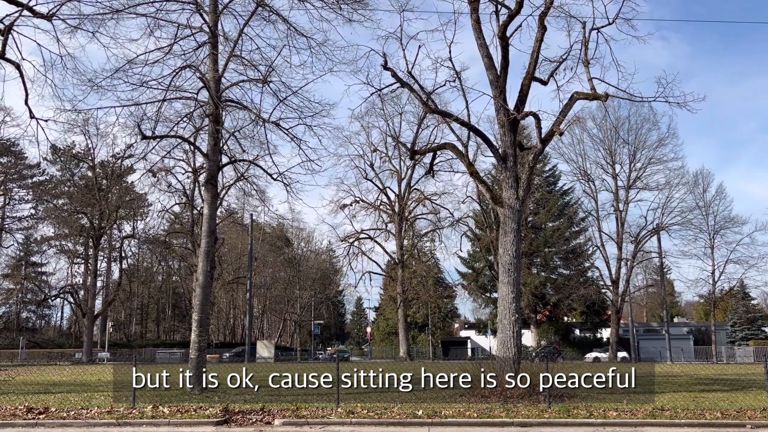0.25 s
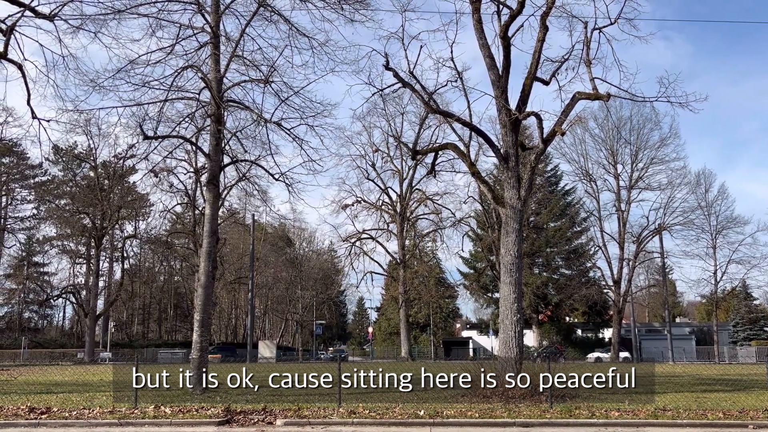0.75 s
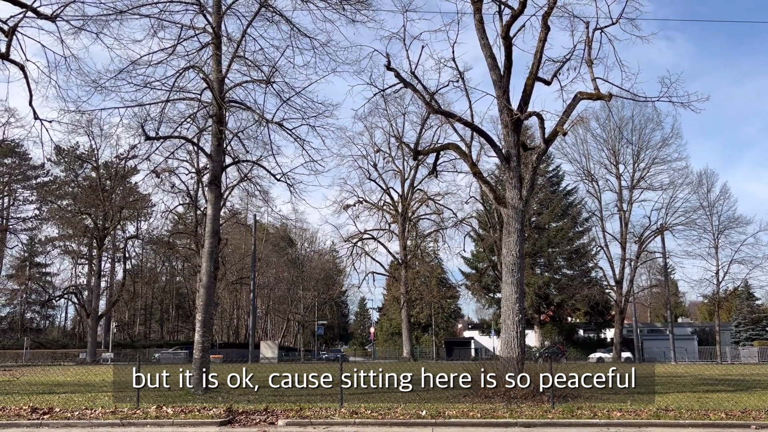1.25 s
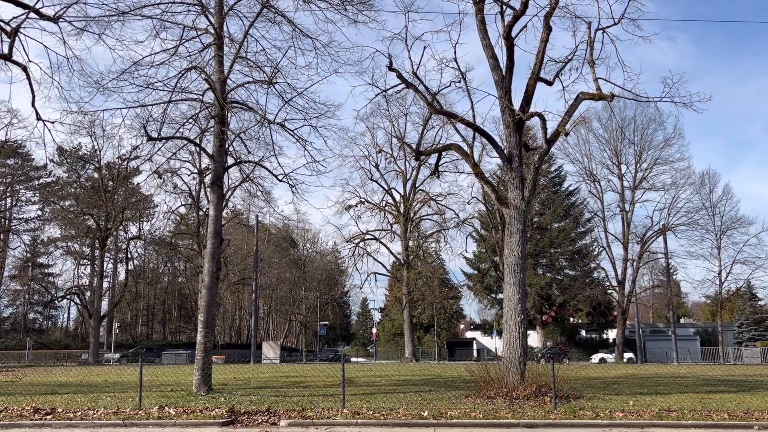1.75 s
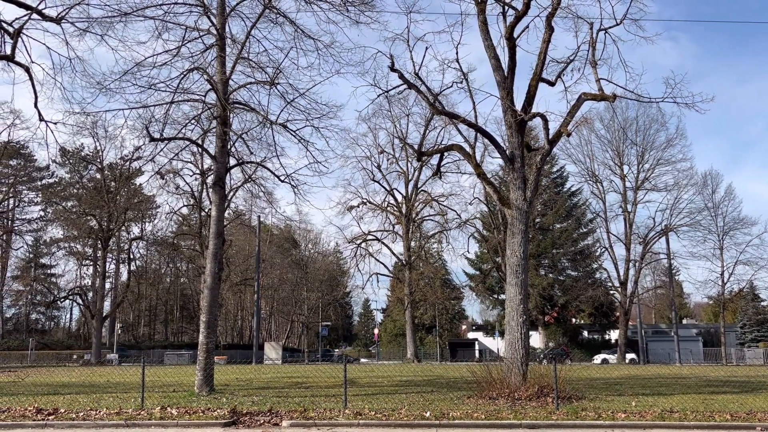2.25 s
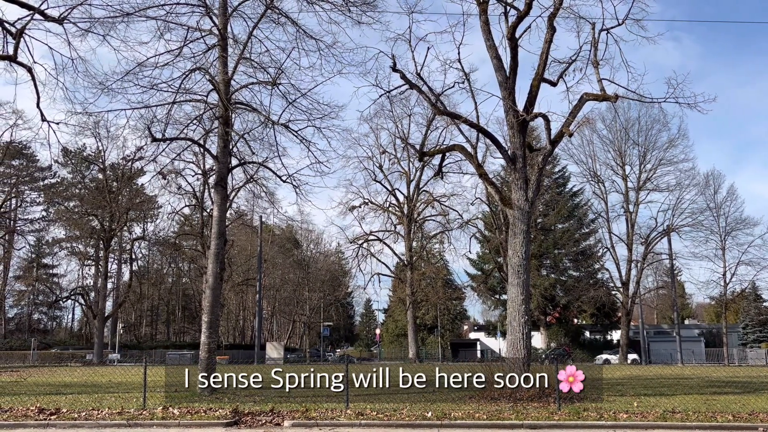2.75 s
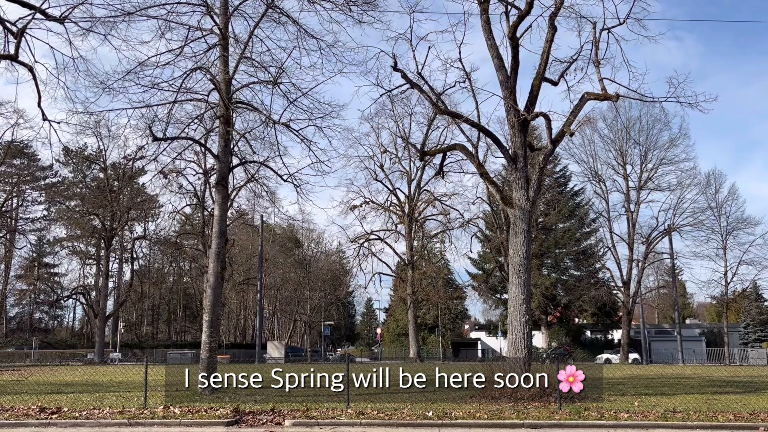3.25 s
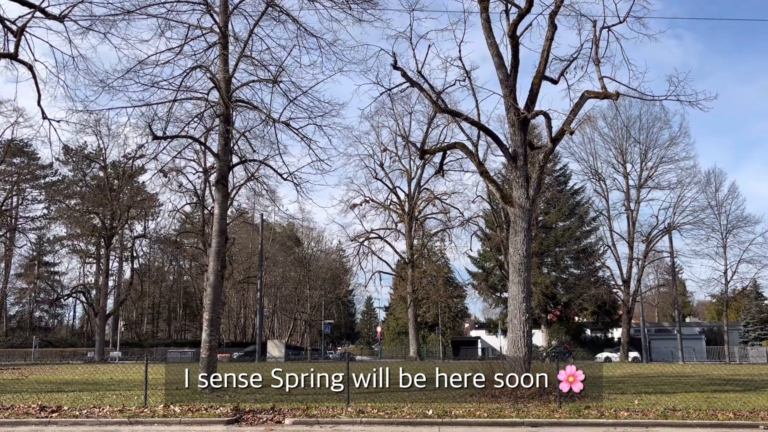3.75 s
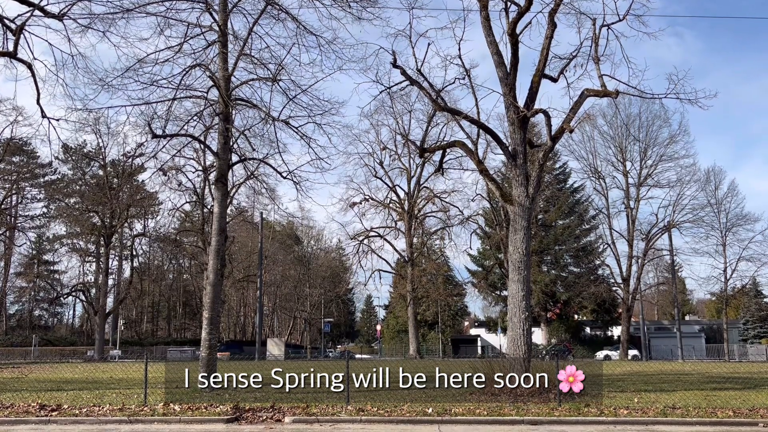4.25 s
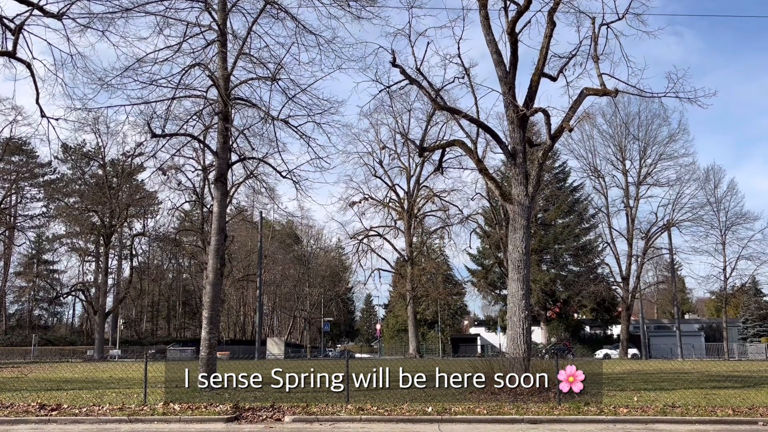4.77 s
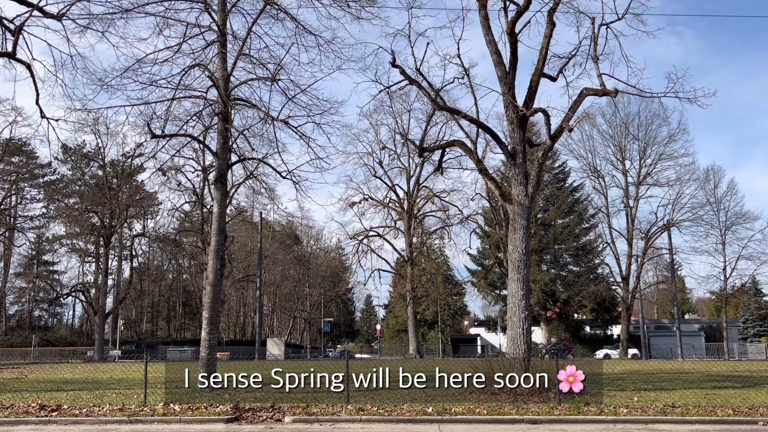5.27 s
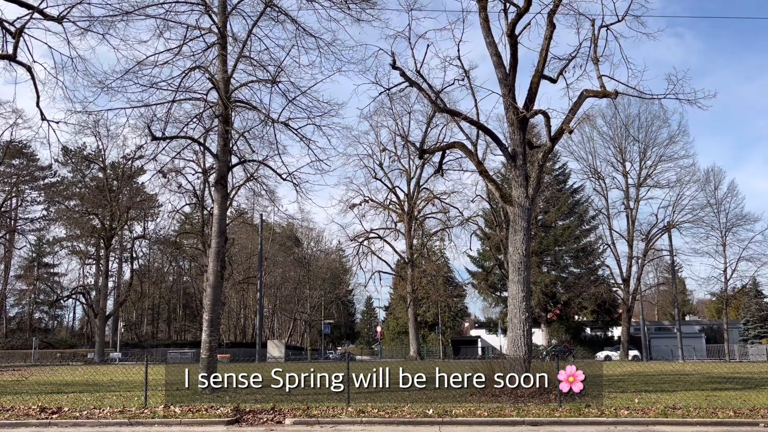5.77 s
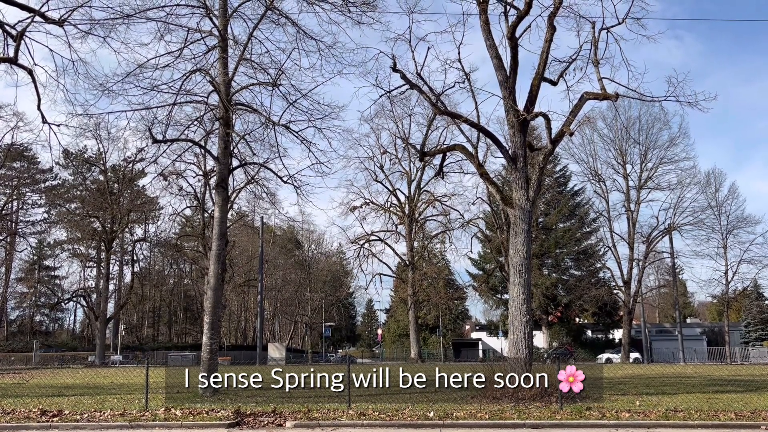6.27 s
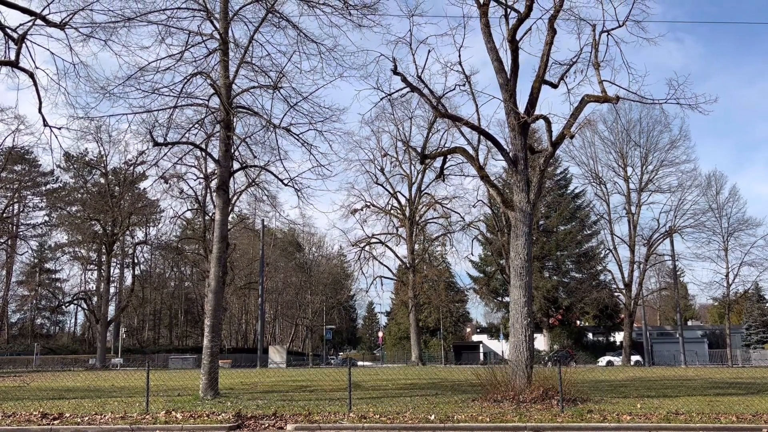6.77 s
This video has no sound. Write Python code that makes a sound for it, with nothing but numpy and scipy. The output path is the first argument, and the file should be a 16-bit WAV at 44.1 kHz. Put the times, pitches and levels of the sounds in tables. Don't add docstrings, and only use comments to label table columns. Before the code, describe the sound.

A quiet park beside a far road, heard through a small stereo microphone. Low, soft traffic rumble runs throughout, with muffled tyre roar, faint hiss and humming engine drones. From 0 to 0.5 s a few tiny falling cheeps and a chip sit over it. The traffic swells gently around 1.3 to 2.5 s, then eases away; one engine drone slides downward until about 5.7 s, and another rises faintly at the end. A very thin whistle wavers far off now and then. At 2.4 s a high, trembling buzz lasts about 0.6 s, with a fainter, higher one at 3.8 s. Breezy hiss puffs up at 2.8 s and between 4 and 5 s. From 4.35 to 5.65 s a songbird gives six quick upward slurs, clear and echoing off trunks, while tiny dry twig ticks sound nearby. Two short rising peeps follow at 6.05 and 6.3 s, leaving soft rumble.

```python
import sys
import numpy as np
from scipy import signal
from scipy.fft import rfft, irfft, next_fast_len
from scipy.io import wavfile
from scipy.ndimage import uniform_filter1d, minimum_filter1d

SR = 44100
rng = np.random.default_rng(int(sys.argv[2]) if len(sys.argv) > 2 else 0)


def level_to_linear(level):
    exponent = np.asarray(level, float) / 20
    return 10 ** exponent


def persist_wave(psi):
    counts = np.round(np.clip(psi, -1, 1) * 32767).astype(np.int16)
    wavfile.write(sys.argv[1], SR, np.atleast_2d(counts).T)


N = 309141

# [t/s, level/dB]
NEARNESS = [
    (0, 0.5),
    (.5, 0.5),
    (1.3, 2),
    (2.499, 1.5),
    (3.4, 0.5),
    (4.5, -1.5),
    (5.4, -1.5),
    (6, -3),
    (7.01, -3),
]
# [t/s, half-width/s, lift/dB]
BREEZES = [
    (0, 0.13, 4),
    (2.75, .25, 3),
    (4.0, 0.32, 2),
    (4.55, 0.32, 4),
    (5.08, 0.21, 6),
]
# [f/Hz, density/dB per Hz]
RUMBLE_SPECTRUM = [(12, -37.5), (20, -10.5), (38, -8.5), (59, 6.5), (81, -9), (141, -7.5), (167, -10.5),
                   (248, -0.5), (278, -3), (325, -19), (392, -22.5), (600, -34.5), (780, -54), (1320, -120)]
ROAR_SPECTRUM = [(210, -28), (350, 2), (392, -8), (440, -3), (756, -10.5), (1340, -11.5), (1600, -21),
                 (2080, -43), (3520, -120)]
TREAD_SPECTRUM = [(1000, -29.5), (1600, 1.5), (2200, 1.5), (2900, -6), (3600, -14), (5000, -36.5)]
HISS_SPECTRUM = [(2000, -20.5), (3200, -6), (4000, -8.5), (6000, -18.5), (8000, -25.5), (10000, -36.5),
                 (12000, -60)]
# [f/Hz, density/dB per Hz]
SELF_NOISE_SPECTRUM = [(5000, -23.5), (8000, -3), (10000, 0), (12500, -1.5), (13500, -8.5), (13750, -43.5)]
# [f/Hz, likeness/1]
PORT_LIKENESS = [(40, 1), (125, 1), (300, 0.74), (600, 0.45), (1300, 0.069), (2900, 0.96), (6000, .75),
                 (12000, .75)]
# [f/Hz, level/dB]
PORT_LEVEL = [(60, -1), (150, -2), (370, 2.5), (910, 2.5), (2240, -0.5), (5540, 1.5), (13700, -1)]
# [f/Hz, phase/rad]
PORT_PHASE = [(40, 0), (110, 0.7), (300, 0.24), (780, 0.83), (1290, 2.02), (1980, -1.27), (3200, 1.56),
              (4820, 0.07), (5500, 1), (7300, 0.5), (9730, -2.5), (12000, -6), (14000, -5)]
# [t/s, f/Hz]
STEADY_FIRING = [(0, 62), (.8, 60.5), (1.3, 62), (1.7, 63), (3, 64), (4.2, 65), (4.8, 63.5), (5.5, 63),
                 (6.5, 62), (7.01, 61)]
SLOWING_FIRING = [(1.5, 59.5), (2.4, 54), (3.2, 49), (4.5, 41), (5, 39), (5.7, 37.5)]
RISING_FIRING = [(5.4, 49), (6.3, 52), (7.01, 57)]
# [t/s, firing order level/dB, next strong order level/dB]
STEADY_LOAD = [(0, -44, -63), (.55, -53, -69), (.75, -44, -65.5), (1.3, -43, -61), (1.5, -50, -62),
               (2.6, -63.5, -61), (3.2, -48.5, -65), (4.1, -48.5, -64), (4.5, -48.5, -64.5),
               (4.75, -56.5, -50.5), (5.101, -54, -62), (5.9, -53, -61.5), (6.5, -51.5, -61.5),
               (7.01, -47, -67)]
SLOWING_LOAD = [(1.602, -55, -61), (2.3, -38, -67), (2.7, -39.5, -64.5), (3.15, -60, -51.5),
                (3.7, -57, -57), (4.1, -50, -67), (4.7, -49, -62), (5.3, -53.5, -62), (5.701, -65.5, -68)]
RISING_LOAD = [(5.4, -71, -78), (5.9, -58, -75), (6.5, -59.5, -69.5), (6.8, -56, -78), (7.01, -47.5, -81)]
# [t/s, peak level/dB, level of the duller part/dB]
TWIG_TICKS = [
    (3.1797, -75, -3),
    (4.5665, -78, -2),
    (4.582, -78, -2),
    (4.778, -81, 2),
    (4.8633, -79, 0),
    (5.2458, -66, -4),
    (5.4525, -75, -2),
    (5.6022, -77, 0),
    (5.663, -84, 0),
]
# [t/s, length/s, f/Hz, level/dB]
THIN_WHISTLES = [(0.798, 0.37, 5920, -97.5), (1.26, .44, 5950, -97), (2.79, 0.55, 5990, -99),
                 (3.724, 0.27, 6030, -97), (4.045, 0.15, 5950, -94.5), (4.38, .17, 5980, -96),
                 (4.85, .5, 5860, -99), (5.9, .2, 5960, -100), (6.25, 0.26, 6000, -100),
                 (6.62, .3, 6100, -99)]
# [t/s, length/s, held f/Hz, level/dB, glide into it/Hz]
CHEEP_CALLS = [
    (0.067, .066, 4090, -71, 327.5),
    (.152, .03, 4090, -75, 7),
    (.235, .03, 4080, -81, 5),
    (.262, .085, 3750, -81, -28),
    (.41, .05, 3690, -86, 3),
    (4.33, .085, 4120, -77.5, 169),
]
CHIP_CALLS = [
    (.002, .028, 4985, -78, 5),
    (4.078, .09, 5000, -76, 220),
]
PEEP_CALLS = [
    (6.052, 0.095, 4030, -61, -400),
    (6.33, .098, 3880, -64, -290),
]
# [t/s, length/s, held f/Hz, level/dB, glide into it/Hz]
BUZZ_CALLS = [
    (2.416, .61, 7187, -65, 60),
    (3.819, .5, 7352, -73.5, 4.5),
]
# [t/s, rise/s, top f/Hz, level/dB, early haste/1 (below 0 lingers)]
SLUR_CALLS = [
    (4.355, 0.11, 3276, -54, -0.016),
    (4.564, 0.11, 3295, -52, 0.13),
    (4.76, .132, 3216, -56.5, 0.17),
    (4.985, 0.12, 3190, -57, .1),
    (5.235, .122, 3153, -56, -0.12),
    (5.534, .102, 3042, -54.5, -.3),
]
# [f/Hz, t60/s]
GROVE_DECAY = [(2000, 2.3), (3300, 0.59), (4000, 0.89), (5000, 0.43), (7500, 1.04), (12000, 0.23)]
# [tone f/Hz, depth below it that is lost/dB]
MASKING_DEPTH = [(2000, 70), (3000, 53), (3350, 37), (3850, 26), (4050, 29), (5000, 40), (7300, 32),
                 (9000, 36)]


def evened(x):
    return x / np.sqrt(np.mean(x ** 2) + 1e-30)


def read(points, hz):
    f, value = np.transpose(points)
    return np.interp(np.log(hz + 1), np.log(f + 1), value)


def add(mix, start_s, sound):
    part = mix[round(start_s * SR):][:len(sound)]
    part += sound[:len(part)]


def drift(count, rate_hz):
    size = max(int(SR / rate_hz), 1)
    smooth = uniform_filter1d(rng.standard_normal(count), size)
    return evened(uniform_filter1d(smooth, size))


def wash(colour, patchy_db):
    frames, hz = N // 512 + 5, np.fft.rfftfreq(2048, 1 / SR)
    a, b, c, d, patches = rng.standard_normal((frames, 1025, 5)).T
    patches = uniform_filter1d(patches, size=16, axis=0)
    patches = evened(uniform_filter1d(patches, size=10, axis=1))
    same = np.clip(read(PORT_LIKENESS, hz), 0, 1)[:, None]
    left = a + 1j * b
    right = same * left + np.sqrt(1 - same ** 2) * (c + 1j * d)
    z = np.array([left, right]) * level_to_linear(read(colour, hz)[:, None] + patchy_db * patches)
    noise = signal.istft(z, nperseg=2048, noverlap=1536)[1]
    return evened(noise[:, 1024:N + 1024])


def traffic():
    t = np.arange(N) / SR
    near_db = np.interp(t, *np.transpose(NEARNESS))
    breeze_db = sum(db * np.exp(-((t - s) / width_s) ** 2) for s, width_s, db in BREEZES)
    rumble = level_to_linear(-46 + 0.32 * near_db) * wash(RUMBLE_SPECTRUM, patchy_db=1.0)
    roar = level_to_linear(-58.5 + 0.85 * near_db) * wash(ROAR_SPECTRUM, patchy_db=1.34)
    tread = level_to_linear(-70 + 1.1 * near_db) * wash(TREAD_SPECTRUM, patchy_db=1.27)
    hiss = level_to_linear(-79.5 + 0.92 * near_db + breeze_db) * wash(HISS_SPECTRUM, patchy_db=2.0)
    return rumble + roar + tread + hiss


def engine(firing, load, order):
    s, first_db, next_db = np.transpose(load)
    t = np.arange(s[0], s[-1], 1 / SR)
    hz = np.interp(t, *np.transpose(firing)) * (1 + 0.0088 * drift(len(t), 5.17))
    phase_rad = 2 * np.pi * np.cumsum(hz) / SR
    first = level_to_linear(np.interp(t, s, first_db) + 1.8 * drift(len(t), 2.1)) * np.sin(phase_rad)
    upper = level_to_linear(np.interp(t, s, next_db) + 0.74 * drift(len(t), 3.9)) * np.sin(order * phase_rad)
    return s[0], np.sqrt(2) * (first + upper)


def engines():
    out = np.zeros(N)
    add(out, *engine(STEADY_FIRING, STEADY_LOAD, order=1.5))
    add(out, *engine(SLOWING_FIRING, SLOWING_LOAD, order=2))
    add(out, *engine(RISING_FIRING, RISING_LOAD, order=2))
    return out


def twigs():
    out, t = np.zeros(N), np.arange(2600) / SR
    snap = np.exp(-t / .0009)
    rustle = .14 * np.exp(-t / .012)
    bounce = .5 * (t > .0035) * np.exp(-abs(t - .0035) / .0012)
    bright = signal.butter(2, [9000, 13800], "bandpass", fs=SR, output="sos")
    dull = signal.butter(2, [4200, 9000], "bandpass", fs=SR, output="sos")
    for s, peak_db, low_db in TWIG_TICKS:
        burst = (snap + rustle + bounce) * rng.choice([-1., 1.], len(t))
        tick = signal.sosfilt(bright, burst) + level_to_linear(low_db + 5) * signal.sosfilt(dull, burst)
        add(out, s, level_to_linear(peak_db + 6) * tick)
    return out


def grove(x, wet_db, ring):
    taps = np.zeros((2, SR))
    at = np.arange(300, SR - 20, 20) + rng.integers(0, 20, (2, (SR - 301) // 20))
    strength = level_to_linear(0.97 * rng.standard_normal(at.shape))
    np.put_along_axis(taps, at, rng.choice([-1., 1.], at.shape) * strength, 1)
    taps[1] = 0.85 * taps[0] + .7 * taps[1]
    hz, t, z = signal.stft(taps, SR, nperseg=256)
    build = 1 - 0.29 * np.exp(-t / 0.03)
    decay = level_to_linear(-60 * t / (ring * read(GROVE_DECAY, hz)[:, None]))
    tail = signal.istft(z * build * decay, SR, nperseg=256)[1]
    return level_to_linear(wet_db) * signal.oaconvolve(x[None], tail / np.linalg.norm(tail[0]), axes=1)


def note(rows, flutter_db=1.5, warble_hz=0, warbles=100, overtone_db=-45, fourth_db=-90):
    s, hz, db = np.transpose(rows)
    t = np.arange(s[0], s[-1], 1 / SR)
    swing = np.sin(2 * np.pi * np.cumsum(warbles * (1 + 0.42 * drift(len(t), 45))) / SR)
    phase_rad = 2 * np.pi * np.cumsum(np.interp(t, s, hz) + warble_hz * swing) / SR
    level = level_to_linear(np.interp(t, s, db) + flutter_db * drift(len(t), 110))
    strain = level_to_linear(fourth_db) * level / level_to_linear(-53)
    tone = np.exp(1j * phase_rad) + level_to_linear(overtone_db) * np.exp(2j * phase_rad)
    tone += strain * np.exp(4j * phase_rad)
    edge = np.minimum(np.minimum(t - t[0], t[-1] - t) / .006, 1)
    return s[0], np.sqrt(2) * tone * level * edge


def bird(calls, lean_db, dry_db, wet_db, ring=1.0, ground=0, ground_hz=273.0, **voice):
    song = np.zeros(N + SR, complex)
    for rows in calls:
        add(song, *note(rows, **voice))
    start, end = np.flatnonzero(song)[[0, -1]]
    echoes = grove(song[start:end], wet_db, ring)
    echoes = echoes * np.exp(1.2j * drift(echoes.shape[1], 70))
    wall_s, wall_share = .013, .55
    bounces = np.roll(song, round(SR / ground_hz)) + wall_share * np.roll(song, round(wall_s * SR))
    direct = (song + ground * bounces).real
    side_db = lean_db * np.array([[.5], [-.5]])
    heard = np.pad(direct * level_to_linear(dry_db + side_db), ((0, 0), (0, SR)))
    heard[:, start:start + echoes.shape[1]] += echoes.real
    return heard[:, :N]


def held(start_s, length_s, hz, db, glide_hz=0, settle=0.23, soft_db=-18, swell=.2, grow_db=0, end_db=-5):
    u = np.linspace(0, 1, 24)
    pitch_hz = hz + glide_hz * np.exp(-(u / settle) ** 1.4)
    level_db = db + soft_db * np.exp(-u / swell) + grow_db * u + end_db * u ** 6
    return np.transpose([start_s + length_s * u, pitch_hz, level_db])


def whistlers():
    thin = [held(*row, soft_db=-4, swell=.06, end_db=-7.5) for row in THIN_WHISTLES]
    cheeps = [held(*row, settle=.25, soft_db=-9.5, swell=0.28, end_db=-2.5) for row in CHEEP_CALLS]
    chips = [held(*row, settle=.17, soft_db=-7, swell=.15, end_db=-4) for row in CHIP_CALLS]
    peeps = [held(*row, settle=0.27, soft_db=-20, swell=0.34, end_db=-13) for row in PEEP_CALLS]
    out = bird(thin, lean_db=-3.0, dry_db=2, wet_db=-9.5, flutter_db=4, warble_hz=30, warbles=9)
    out += bird(cheeps, lean_db=9.5, dry_db=-1.5, wet_db=-4.0, ring=1.0,
                flutter_db=4.5, warble_hz=30, warbles=54)
    out += bird(chips, lean_db=6.0, dry_db=0.5, wet_db=-11, flutter_db=3)
    out += bird(peeps, lean_db=0.0, dry_db=1.0, wet_db=-8, ring=0.92, flutter_db=-0.5)
    return out


def buzzers():
    loud, faint = BUZZ_CALLS
    loud_note = held(*loud, soft_db=-17, swell=0.087, grow_db=1.5, end_db=-8.5)
    faint_note = held(*faint, soft_db=-15, swell=0.033, grow_db=-0.9, end_db=-2.0)
    out = bird([loud_note], lean_db=1.5, dry_db=-3.0, wet_db=-4, ring=0.7,
               flutter_db=4.0, warble_hz=110, warbles=130, overtone_db=-36.0)
    out += bird([faint_note], lean_db=3.5, dry_db=-3.0, wet_db=-4.5, ring=0.98,
                flutter_db=5, warble_hz=60.3, warbles=61, overtone_db=-46)
    return out


def slur(start_s, rise_s, top_hz, db, haste):
    u = np.linspace(0, 1, 24)
    climb = np.sin(np.pi / 2 * u ** (1.25 - haste))
    climb += max(haste, 0) * np.sin(2.6 * np.pi * u) * (1 - u)
    low_hz = 2352 - 350 * haste
    pitch_hz = low_hz + (top_hz - low_hz) * climb
    level_db = db - 20.5 * np.exp(-u / (0.26 - .5 * haste)) - 3 * u ** 8
    rows = np.transpose([start_s + rise_s * u, pitch_hz, level_db])
    s, _, top_db = rows[-1]
    hook_s, floor_hz, hook_db = .014, 2950, -11
    midway = (s + hook_s / 2, floor_hz, top_db + hook_db / 2)
    bottom = (s + 1.3 * hook_s, floor_hz, top_db + hook_db)
    return np.vstack([rows, midway, bottom])


def songbird():
    return bird([slur(*row) for row in SLUR_CALLS], lean_db=-3.0, dry_db=3, wet_db=-6.5, ground=0.47,
                flutter_db=3.0, overtone_db=-47.5, fourth_db=-53)


def scene():
    return traffic() + engines() + twigs() + whistlers() + buzzers() + songbird()


def masked(x, slope_db=27.0, cut_db=-22):
    hz, _, z = signal.stft(x, SR, nperseg=1024)
    power = (abs(z) ** 2).mean(0)
    fall_db = slope_db * np.log2(hz + 1)[:, None]
    lasting = -minimum_filter1d(-power, size=3, axis=1)
    reach_db = 10 * np.log10(lasting + 1e-20) - read(MASKING_DEPTH, hz)[:, None] + fall_db
    limit_db = np.maximum.accumulate(reach_db, 0) - fall_db
    band_db = 10 * np.log10(uniform_filter1d(power, size=9, axis=0) + 1e-20)
    lost = (band_db < limit_db) * (hz > 3000)[:, None]
    return signal.istft(z * level_to_linear(cut_db * lost), nperseg=1024)[1][:, :N]


def roll_off(x):
    return signal.sosfilt(signal.butter(12, 14310, fs=SR, output="sos"), x)


def record(dry):
    size = next_fast_len(N + 8192)
    noisy = dry + level_to_linear(-97) * wash(SELF_NOISE_SPECTRUM, patchy_db=0)
    padded = np.pad(noisy, ((0, 0), (4096, 4096)), "reflect")
    padded *= signal.windows.tukey(N + 8192, 8192 / (N + 8192))
    hz = np.fft.rfftfreq(size, 1 / SR)
    body = hz ** 2 / (hz ** 2 + 34 ** 2)
    half = level_to_linear(read(PORT_LEVEL, hz) / 2) * np.exp(.5j * read(PORT_PHASE, hz))
    ports = irfft(rfft(padded, size) * body * np.array([half, 1 / half]), size)[:, 4096:N + 4096]
    fade_in = np.minimum(np.arange(N) / 200, 1)
    return roll_off(masked(ports) * fade_in)


dry = scene()
out = record(dry)
persist_wave(out)
```